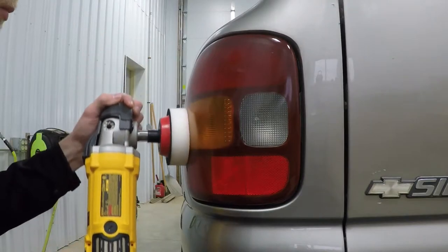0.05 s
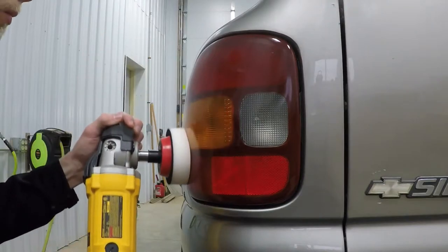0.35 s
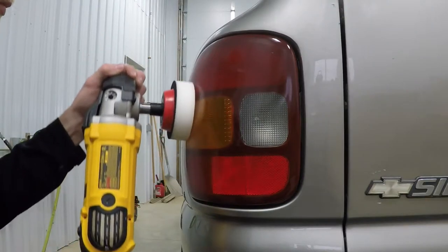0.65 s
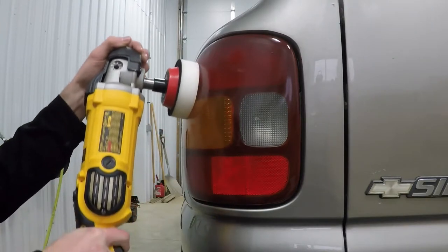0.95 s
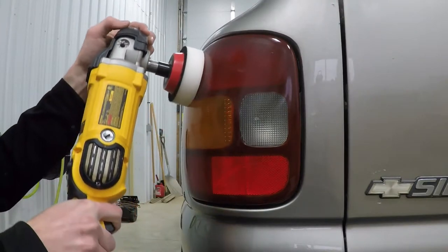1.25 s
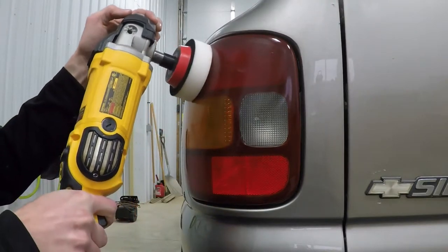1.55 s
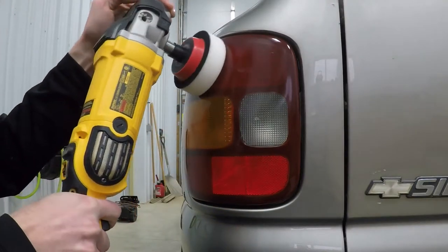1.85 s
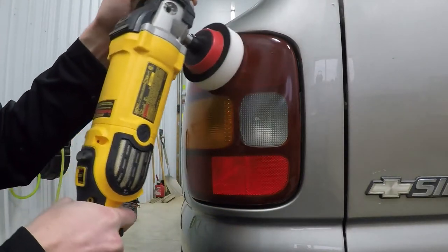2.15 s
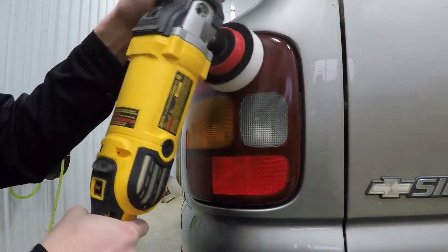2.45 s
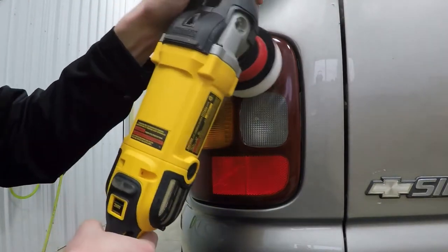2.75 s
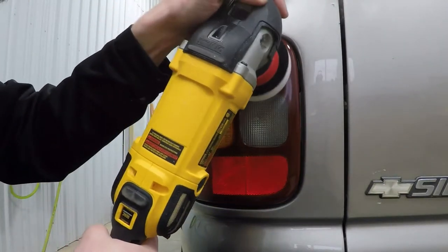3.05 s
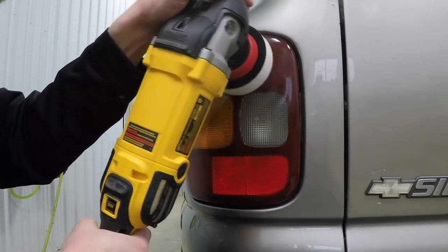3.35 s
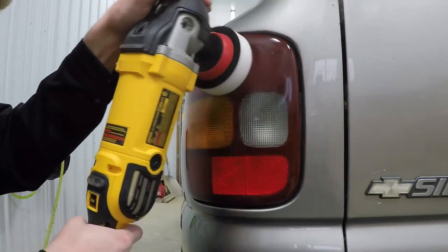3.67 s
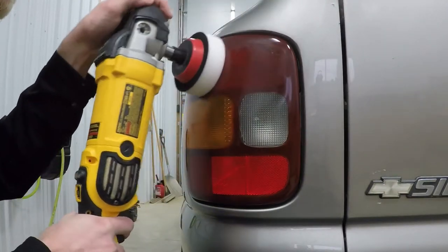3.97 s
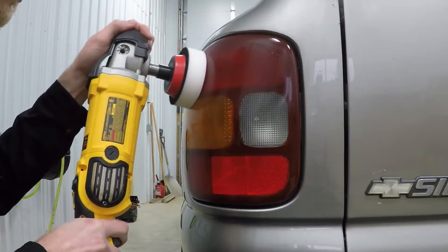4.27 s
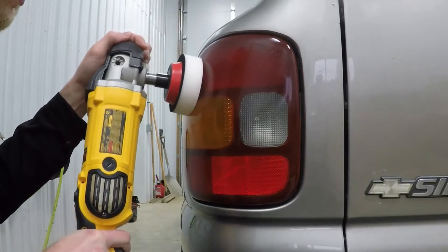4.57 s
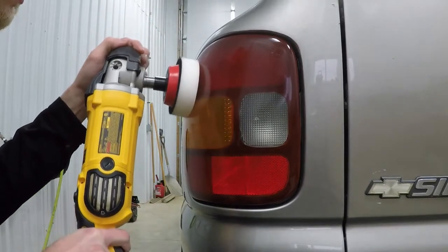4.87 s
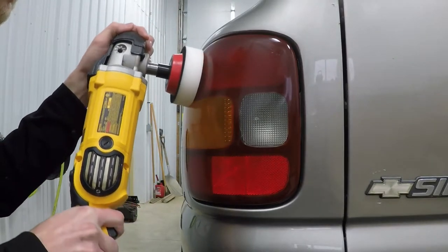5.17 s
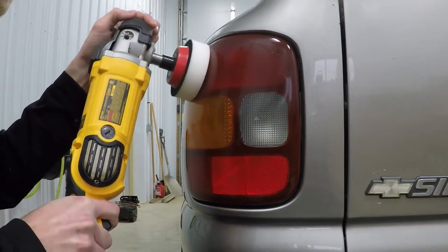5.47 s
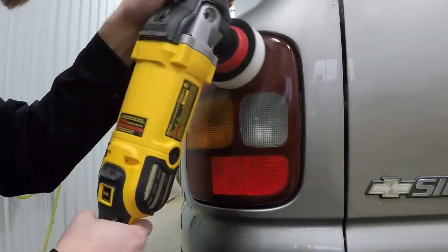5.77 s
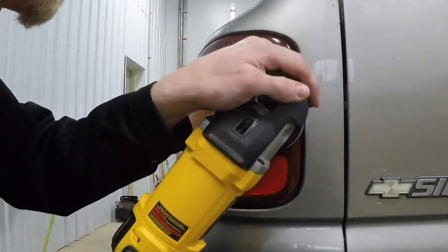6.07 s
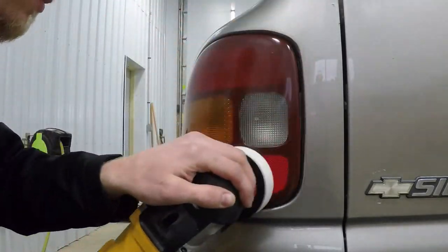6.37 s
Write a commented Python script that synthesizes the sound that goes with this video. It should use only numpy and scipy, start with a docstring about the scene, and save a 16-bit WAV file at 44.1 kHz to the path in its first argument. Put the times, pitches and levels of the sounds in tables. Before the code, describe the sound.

An electric polisher runs close by in a garage, its motor whine sagging and climbing as a foam pad rubs a plastic lens.

```python
"""An electric rotary polisher works a foam pad over a plastic lamp lens in a garage, heard close, in mono.
It is already running: cooling air rushes through the vents, mains pulses rattle the gear head, and fan,
gears and commutator sing on multiples of the motor speed. The pitch rises briefly, sags under pressure
on the pad until 1.6 s, then climbs to its peak at 4.6 s as the pressure eases.
It dips once more near 5.3 s, and the sound cuts off abruptly at 5.75 s."""
import sys
import numpy as np
from scipy import signal
from scipy.fft import rfft, irfft, next_fast_len
from scipy.io import wavfile
from scipy.ndimage import map_coordinates

SR = 44100
rng = np.random.default_rng(int(sys.argv[2]) if len(sys.argv) > 2 else 0)


def file_out(sig):
    """Save sig as 16-bit WAV at sys.argv[1]."""
    # one column per channel
    cols = np.atleast_2d(sig).T
    # limit, then scale
    lim = np.clip(cols, -1, 1)
    pcm = np.round(lim * 32767).astype(np.int16)
    wavfile.write(sys.argv[1], SR, pcm)


N = 283107
TIME = np.arange(N) / SR


def amp(db):
    """Decibels to gain."""
    return 10 ** (np.asarray(db) / 20)


def unit(x):
    """Scale to rms 1."""
    return x / np.sqrt(np.mean(x ** 2) + 1e-20)


def along(points, hz):
    """Read (f/Hz, value) points on a log frequency axis."""
    f, values = np.transpose(points)
    return np.interp(np.log(hz + 1), np.log(f + 1), values)


def curves(rows):
    """One automation curve for each column after the time."""
    times, *columns = np.transpose(rows)
    return [np.interp(TIME, times, column) for column in columns]


def swells(rows):
    """Decibels added by bell-shaped swells, each (middle t/s, length/s, level/dB)."""
    return sum(db * np.exp(-(2 * (TIME - middle) / length) ** 2) for middle, length, db in rows)


def wobble(rate):
    """A smooth random curve, rate knots a second."""
    coarse = np.arange(0, N + 32, 32)
    knots = rng.standard_normal(int(N * rate / SR) + 4)
    return np.interp(np.arange(N), coarse, map_coordinates(knots, [coarse * rate / SR]))


def filtered(x, response):
    """Equalise x with a gain that is a function of frequency."""
    size = next_fast_len(N + 8192)
    return irfft(rfft(x, size) * response(np.fft.rfftfreq(size, 1 / SR)), size)[..., :N]


def noise(spectrum, gate=1):
    """Noise of rms 1, gated and then coloured by a spectrum."""
    return unit(filtered(gate * rng.standard_normal(N), lambda hz: amp(along(spectrum, hz))))


def bursts(cycles, sharpness):
    """One smooth burst of height 1 per cycle."""
    return np.exp(sharpness * (np.cos(2 * np.pi * cycles) - 1))


def tone(cycles):
    """A sine of rms 1 with a random starting phase."""
    return np.sqrt(2) * np.sin(2 * np.pi * (cycles + rng.random()))


def ring_on(x, t60):
    """Smear x over a short dense decay, keeping its colour."""
    t = np.arange(SR // 5) / SR
    decay = rfft(rng.standard_normal(len(t)) * amp(-60 * t / t60))
    flat_tail = irfft(decay / np.abs(decay))[:len(t) // 2]
    return signal.fftconvolve(x, flat_tail)[:N]


# Reverb time of the garage: f/Hz, t60/s
GARAGE_DECAY = [(150, 0.39), (2000, 1), (12000, 0.2)]
def garage(x):
    """The walls answer 5 ms later with a diffuse tail, the treble dying first."""
    hz, t, spectra = signal.stft(rng.standard_normal(SR // 2), SR, nperseg=256)
    decay = amp(-60 * t / along(GARAGE_DECAY, hz)[:, None])
    tail = signal.istft(spectra * decay, SR, nperseg=256)[1]
    return signal.fftconvolve(x, np.pad(tail, (SR // 200, 0)) / np.linalg.norm(tail))[:N]


# EQ of the room tone: f/Hz, level/dB
RUMBLE_EQ = [(10, -12), (25, 1.5), (50, 1.5), (110, -9), (190, -18), (400, -17.5), (1500, -57)]
def hum(turns, pulses, load, shake_db, drift_db=1.8):
    """The rotor's unbalance, its fourth harmonic and the field coils hum over the room's low rumble."""
    coils = amp(-63) * tone(pulses) + amp(-61) * tone(3 * pulses)
    overtone = tone(4 * turns)
    unbalance = amp(-55.5 - 2 * load + shake_db + drift_db * wobble(4.5)) * tone(turns)
    rotor = unbalance + amp(-50 + drift_db * wobble(6.1)) * overtone
    rumble = amp(-50 + 0.98 * wobble(4.7)) * noise(RUMBLE_EQ)
    return rotor + coils + rumble


# EQ of foam rubbing on plastic: f/Hz, level/dB
RUB_EQ = [(120, -17.5), (320, -15.5), (470, -11), (560, -6.5), (630, -7.5), (820, -7.5), (1080, -6.5),
          (1260, -0.5), (1480, 1.5), (1700, -8.5), (2100, -33.5), (4000, -64)]
# Accents where the pad bites harder into the lens: middle t/s, length/s, level/dB
PAD_BITES = [(.08, 0.17, 2), (.95, 0.8, 1.5), (3.3, 0.71, 1.5), (4.35, 0.35, 1.5)]
def pad(turns, load, shake_db, gear_ratio=8.2):
    """The foam rubs harder once per spindle turn and makes the lens drone on multiples of that rate."""
    spindle = turns / gear_ratio
    rub_db = -30.5 - 1.7 * load + swells(PAD_BITES) + 0.7 * tone(spindle)
    rub = amp(rub_db) * noise(RUB_EQ)
    drone_db = -61.5 - 1.5 * load + shake_db
    drone = sum(amp(drone_db + 3 * wobble(2.1)) * tone(k * spindle) for k in (1, 4, 5, 6, 10))
    return rub + drone


# Resonances of the vent slots: f/Hz, level/dB
SLOT_EQ = [(5400, -63.5), (6700, -41), (7400, -45), (8000, -41.5), (8800, -54.5), (9600, -39.5),
           (10300, -53), (10800, -58), (11500, -44.5), (12200, -55), (12900, -64.5), (13900, -51.5),
           (15200, -61.5)]
def whistles(turns, speed, load):
    """High overtones of the fan waver in the air stream and flare as they cross the slots' resonances."""
    out = np.zeros(N)
    for k in (36, 48, 60, 66, 72):
        level_db = along(SLOT_EQ, k * speed) - 1.2 + 0.45 * load + 3 * wobble(9.8)
        out += amp(level_db) * tone(k * turns + .15 * wobble(80))
    return out


# Fan tones as they leave the vents: f/Hz, level/dB
FAN_EQ = [(900, -39), (1050, -39.5), (1150, -40), (1265, -24.5), (1350, -34), (1420, -36), (1490, -28.5)]
def fan(turns, speed):
    """The cooling fan sings on the sixth and seventh shaft orders (multiples of the motor speed)."""
    out = np.zeros(N)
    for k in (6, 7):
        level_db = along(FAN_EQ, k * speed) + wobble(35) + .5 * wobble(5.3)
        out += amp(level_db) * tone(k * turns)
    return out


# Resonant peaks of the casing: f/Hz, width/Hz, level/dB
CASING_PEAKS = [(2750, 450, -33), (3280, 120, -34.5), (3564, 120, -33), (3895, 360, -26.5),
                (4350, 170, -34), (4646, 520, -29.5), (5740, 540, -36)]
def casing(hz):
    """Level in dB of a tone that glides through the casing's resonances."""
    power = sum((amp(db) / (1 + (2 * (hz - centre) / width) ** 2)) ** 2
                for centre, width, db in CASING_PEAKS)
    return 10 * np.log10(power)


def siren(turns, speed, torque, order=30):
    """The fan's blades chop the vent slots; the casing lifts the tone and torque pulses roughen it."""
    level_db = 2 + casing(order * speed) + 1.9 * wobble(41)
    return amp(level_db) * unit((1 + .6 * torque) * tone(order * turns))


# Accents on single shaft orders: middle t/s, length/s, order, level/dB
ORDER_FLARES = [(.45, .8, 28, 7), (.88, .35, 25, 5), (.9, .35, 41, 5), (1.6, .4, 17, 6), (2.3, .4, 54, 6),
                (2.66, .25, 20, 7), (2.85, .3, 11, 10), (3.18, .4, 25, 7), (3.48, .2, 17, 5),
                (3.8, .6, 9, 8), (3.8, .4, 34, 8), (5.4, .5, 22, 5)]
def flare(order):
    """Decibels added while one shaft order rings out for a moment."""
    return swells([(middle, length, db) for middle, length, k, db in ORDER_FLARES if k == order])


def commutator(turns, speed, bars=24, bearing_order=17):
    """The bars pass the brushes; run-out adds a sideband one order up, and a bearing rings lower down."""
    out = np.zeros(N)
    for k, db in ((bars, 0), (bars + 1, -1), (bearing_order, 0)):
        level_db = db + casing(k * speed) + flare(k) + 0.9 * wobble(30)
        out += amp(level_db) * tone(k * turns)
    return out


# Boosts for the shaft orders that stand out of the whine: order, level/dB
WHINE_BOOSTS = [(9, 3), (18, 3), (20, 10), (21, 3), (22, 6), (28, 3), (29, 8), (31, 9), (33, 5), (34, 3),
                (38, 9), (41, 10), (42, 10), (43, 9), (45, 10), (46, 4), (47, 8), (53, 5), (54, 7), (59, 5),
                (62, 6)]
# How the housing radiates an unboosted order: f/Hz, level/dB
HOUSING_EQ = [(1200, -44), (1700, -52), (2100, -42.5), (2700, -36), (2950, -42), (3600, -43.5),
              (4300, -42.5), (4750, -44.5), (5300, -58.5), (6700, -52), (8000, -61.5), (9600, -59.5),
              (10700, -76), (14500, -77)]
def whine(turns, speed):
    """Small knocks repeat every turn; their orders swell as they glide through the housing's resonances."""
    boost_db = dict(WHINE_BOOSTS)
    played_elsewhere = {12, 17, 24, 25, 30}  # gear mesh, bearing, commutator, its sideband, siren
    out = np.zeros(N)
    for k in sorted(set(range(8, 90)) - played_elsewhere):
        level_db = boost_db.get(k, 0) + along(HOUSING_EQ, k * speed) + flare(k) + 2.5 * wobble(12)
        out += amp(level_db) * tone(k * turns)
    return out


# EQ of the cooling air: f/Hz, level/dB
AIR_EQ = [(1200, -32), (2400, -1), (3000, -0.5), (3500, 0.5), (3950, 1.5), (4400, -2.5), (4750, 2),
          (5350, -8), (6100, -9), (6650, -6), (7800, -16), (9450, -15.5), (10600, -19.5), (15200, -30.5)]
# Swells and dips as the vents turn towards the listener or away: middle t/s, length/s, level/dB
AIR_SWELLS = [(.4, 0.26, -2), (1.7, .3, 1), (2.42, 0.3, 1.8), (3.88, 0.28, 0.2), (4.35, 0.34, 0.5),
              (4.85, 0.48, -0.5)]
def vents(turns, load, chop=0.96):
    """Air and brush hiss, chopped once a turn."""
    level_db = -24 - 0.48 * load + swells(AIR_SWELLS) + .5 * wobble(3) + 0.56 * wobble(13)
    return amp(level_db) * noise(AIR_EQ, gate=1 + chop * bursts(turns, sharpness=2.5))


# Ring of the gear head: f/Hz, level/dB
RATTLE_EQ = [(1000, -47.5), (1650, -4), (1820, 4), (2000, 5.5), (2220, 5), (2370, 2.5), (2700, 4.5),
             (2930, -16), (3500, -34.5), (7000, -61.5)]
# Fader rides on the gear head as the tool tilts: t/s, mesh level/dB, rattle level/dB
GEAR_FADERS = [(0, -34, -24.5), (.17, -42, -23), (.25, -20, -19.8), (.45, -22.5, -23.5), (.52, -31.5, -23),
               (.95, -29, -32.5), (1.18, -38, -32.5), (1.5, -25.5, -25.5), (1.72, -28, -27.5),
               (2.03, -21, -26.5), (2.65, -30.5, -21.5), (2.9, -22, -22.5), (3.35, -27.5, -21),
               (3.92, -21.5, -22.5), (4.3, -26, -31.5), (4.55, -20.5, -28.5), (5.05, -21, -27),
               (5.75, -22.5, -25)]
def gears(turns, torque, teeth=12, locked_share=.35):
    """Each torque pulse swells the mesh tone and knocks the teeth through their backlash."""
    mesh_db, rattle_db = curves(GEAR_FADERS)
    mesh = unit((1 + 0.17 * torque) * tone(teeth * turns + 0.11 * wobble(90)))
    # sharp knocks locked to the teeth ring the gear head: sidebands at the pulse rate
    knocks = torque ** 4 * amp(1.5 * wobble(50))
    strikes = tone(teeth * turns) * (knocks - knocks.mean())
    ringing = filtered(strikes, lambda hz: amp(along(RATTLE_EQ, hz)))
    locked = unit(ring_on(ringing, t60=.12))
    # loose knocks fall anywhere, more strongly near the pulse
    loose = noise(RATTLE_EQ, gate=1 + .5 * torque * amp(2.5 * wobble(120)))
    rattle = np.sqrt(locked_share) * locked + np.sqrt(1 - locked_share) * loose
    return amp(mesh_db + 1.2 * wobble(40)) * mesh + amp(rattle_db + 1.5 * wobble(25)) * rattle


# Pitch curve of the motor, in turns a second: t/s, f/Hz
MOTOR_SPEED = [(0.0, 146.9), (0.19, 166.0), (0.32, 174.9), (0.63, 168.7), (0.92, 159.3), (1.35, 153.4),
               (1.59, 151.8), (1.78, 155.1), (2.22, 166.3), (2.78, 183.8), (3.05, 199.6), (3.21, 204.5),
               (3.63, 208.8), (4.12, 210.7), (4.36, 210.9), (4.58, 214.0), (4.92, 212.3), (5.06, 206.6),
               (5.28, 191.7), (5.43, 195.6), (5.59, 196.2), (5.76, 199.8)]
def shaft(free_hz=214, bogged_hz=150, jitter_turns=0.0034):
    """Pressure on the pad slows the shaft: load is 0 when barely touching, 1 when pressed hard."""
    speed, = curves(MOTOR_SPEED)
    turns = np.cumsum(speed) / SR + jitter_turns * wobble(40)
    load = (free_hz - speed) / (free_hz - bogged_hz)
    return turns, speed, load


# Fader rides as the tool is raised and turned: t/s, fan level/dB, commutator level/dB, whine level/dB
TONE_FADERS = [(0, -20.5, -2, -1.5), (.42, -17.5, -0.5, -1.5), (.8, -3.5, 1.5, -.5), (1.15, 4, -.5, -1.5),
               (1.5, -4.5, -2, 0), (2.05, 3, 0, 2), (2.6, -2.5, -2, 0), (2.95, 1, -4, -0.5),
               (3.5, -0.5, 1.5, -2.5), (3.95, 1.5, -1.5, -0.5), (4.4, 1.5, 2.5, 2.5), (5.25, 2.5, 1.5, -1),
               (5.75, 3, 1, -2)]
# Swells of hum and drone as the tool shakes the lamp harder: middle t/s, length/s, level/dB
LAMP_SHAKES = [(2.15, 0.31, 2), (3.92, .5, 5), (4.78, 0.65, 8.5), (5.62, 0.26, 6)]
def scene(mains_hz=60, reverb_db=-15):
    """One shaft drives every part of the tool; the garage's reverb and the hum lie underneath."""
    turns, speed, load = shaft()
    fan_db, commutator_db, whine_db = curves(TONE_FADERS)
    shake_db = swells(LAMP_SHAKES)
    pulses = 2 * mains_hz * TIME  # the speed control fires once in each half cycle of the mains
    torque = bursts(pulses, sharpness=4.8)
    motor = amp(commutator_db) * commutator(turns, speed) + amp(whine_db) * whine(turns, speed)
    fan_tones = amp(fan_db) * fan(turns, speed) + amp(.1 * fan_db) * whistles(turns, speed, load)
    cooling = fan_tones + siren(turns, speed, torque) + vents(turns, load)
    tool = motor + cooling + pad(turns, load, shake_db) + gears(turns, torque)
    mono = tool + amp(reverb_db) * garage(tool) + hum(turns, pulses, load, shake_db)
    return np.array([mono, mono])


def record(dry, end_s=5.754, top_hz=15350):
    """A hard cut ends the sound, and a steep low-pass takes off the highest treble."""
    return filtered(dry * (TIME < end_s), lambda hz: np.clip((top_hz - hz) / 200 + .5, 0, 1))


dry = scene()
out = record(dry)
file_out(out)
```